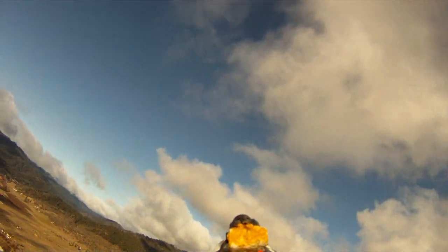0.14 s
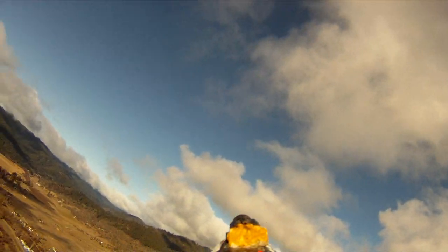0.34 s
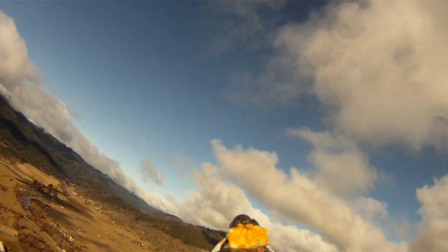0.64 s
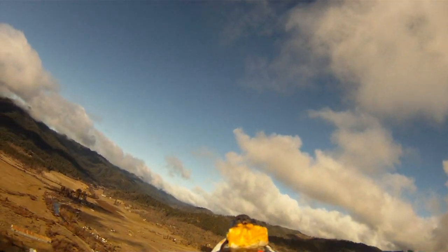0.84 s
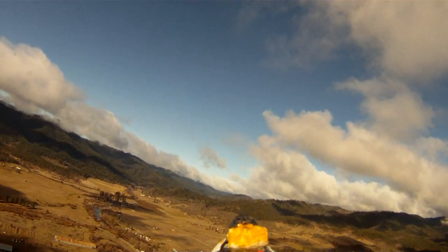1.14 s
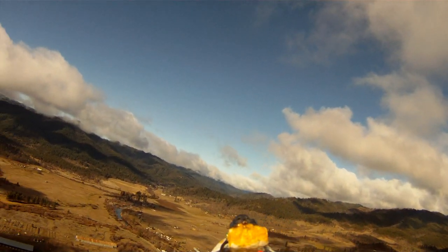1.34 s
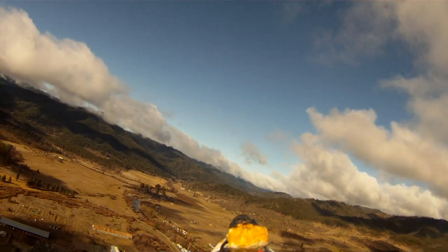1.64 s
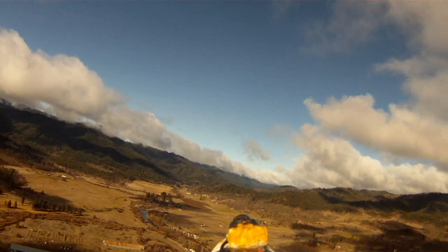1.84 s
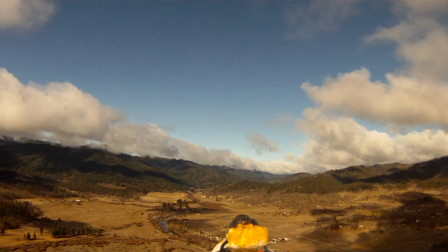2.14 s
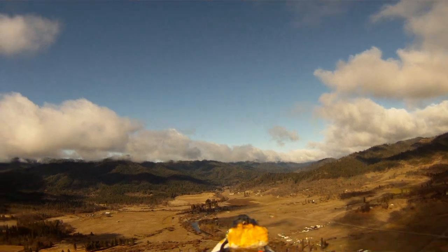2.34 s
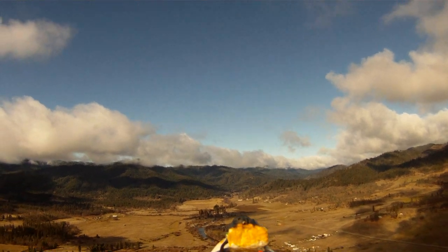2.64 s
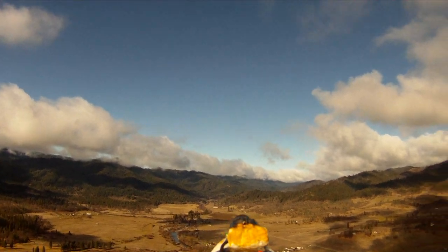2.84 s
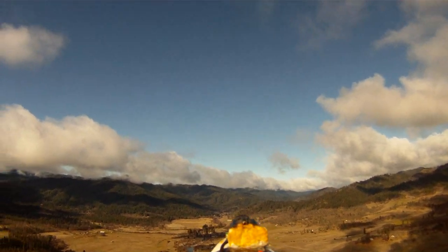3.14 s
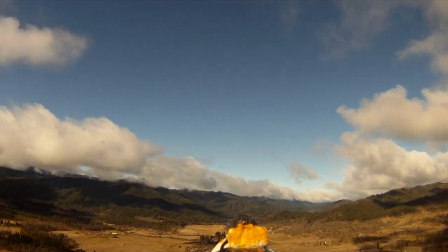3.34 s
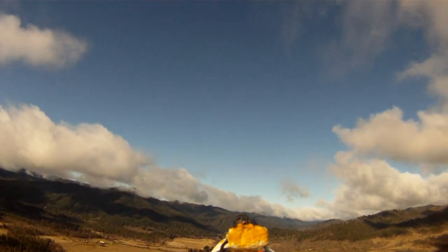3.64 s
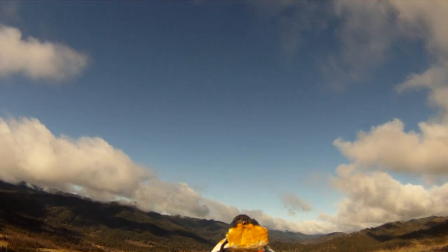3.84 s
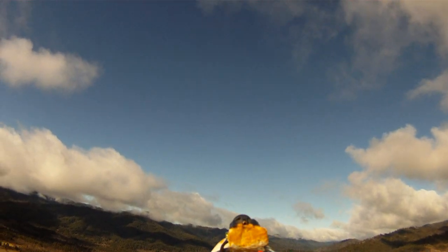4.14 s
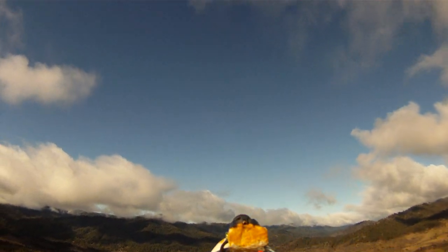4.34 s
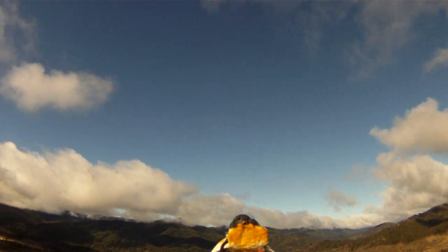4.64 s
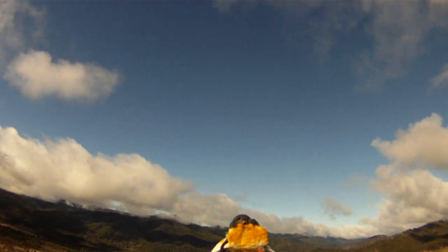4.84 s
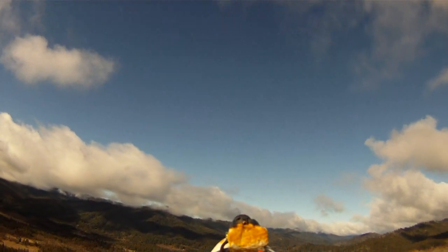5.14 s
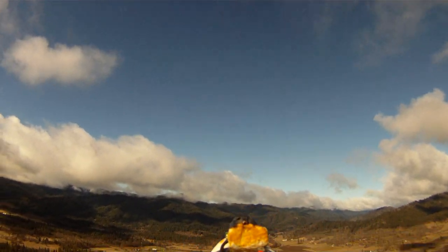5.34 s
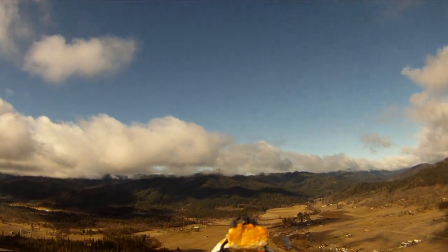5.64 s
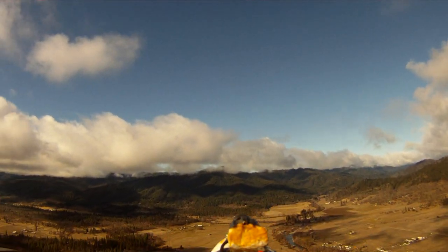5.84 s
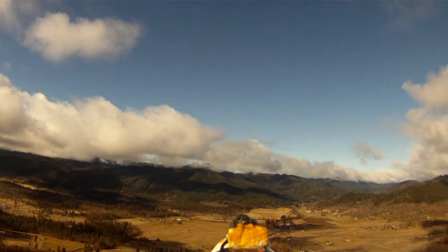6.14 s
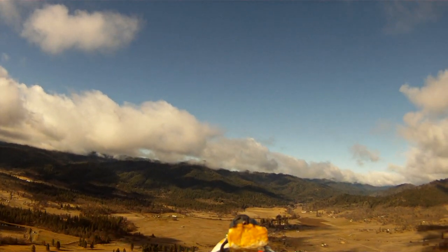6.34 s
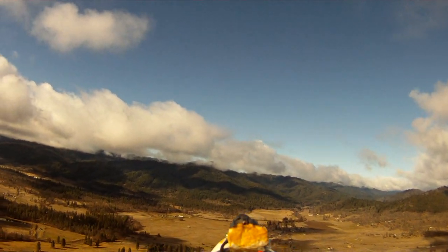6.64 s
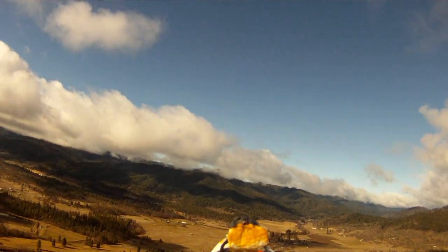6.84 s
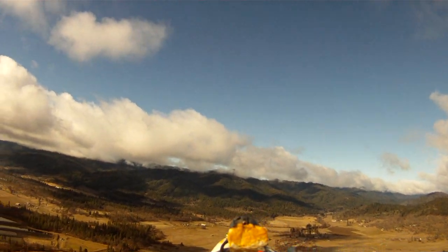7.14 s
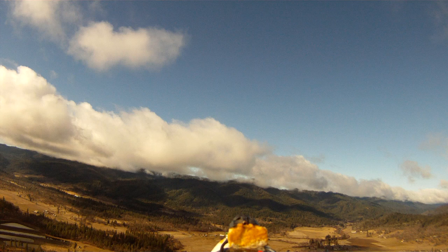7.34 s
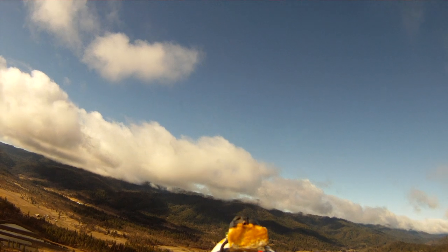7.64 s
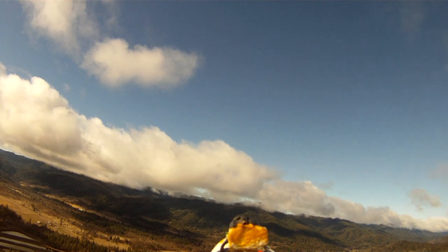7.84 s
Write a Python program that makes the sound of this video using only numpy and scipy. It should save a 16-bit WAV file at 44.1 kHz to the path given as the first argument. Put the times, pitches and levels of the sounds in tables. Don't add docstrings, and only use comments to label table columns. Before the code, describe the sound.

A continuous close propeller buzz vibrates through a light foam airframe high in open air. Slipstream hisses around the microphone and makes the body ring unevenly. Shortly after three seconds the throttle eases back and the pitch falls within about half a second, then stays at a slightly lower, rougher cruise. Later a thin edge whistle wavers in the wind. The sound is dry, low-fidelity and grainy, without any echo.

```python
import sys
import numpy as np
from scipy import signal
from scipy.fft import rfft, irfft, next_fast_len
from scipy.io import wavfile
from scipy.ndimage import uniform_filter1d

SR = 44100
rng = np.random.default_rng(int(sys.argv[2]) if len(sys.argv) > 2 else 0)


def bounce(signal):
    frames = np.transpose(np.atleast_2d(signal))
    limited = np.clip(frames, -1, 1)
    pcm = np.round(limited * 32767).astype(np.int16)
    wavfile.write(sys.argv[1], SR, pcm)


def rack_gain(trim_db):
    fader = np.asarray(trim_db, float)
    return 10 ** (fader / 20)


N = 351918

SETTING_HZ = (311, 301.5, 291.5, 283, 269)
# time_s, blade_rate_gained_hz
AIRSPEED = [(0, -.2), (.6, .3), (1.05, .3), (1.8, -.45), (2.4, .4), (2.8, -1.35), (3.18, .35), (3.36, -.4),
            (3.8, -.4), (3.93, .3), (4.5, -.3), (5.05, -.3), (5.65, .6), (5.9, -1.5), (6.3, -1.25),
            (6.85, .9), (7.3, 1), (7.98, .6)]


def curves(table):
    time_s, *columns = np.transpose(table)
    return [np.interp(np.arange(N) / SR, time_s, column) for column in columns]


def walk(rate_hz):
    hold = int(SR / rate_hz)
    held = np.repeat(rng.standard_normal(N // hold + 1), hold)
    return 1.33 * uniform_filter1d(uniform_filter1d(held, hold), hold)[:N]


def tint(power):
    size = next_fast_len(N)
    hz = np.maximum(np.arange(size // 2 + 1) * SR / size, 1)
    spectrum = rfft(rng.standard_normal(size)) * np.sqrt(power(hz) * SR / 2)
    return irfft(spectrum, size)[:N]


def blade_rate():
    # start_s, length_s, blade_rate_lost_hz
    stick = [
        (3.37, .066, 21.1),
        (3.543, .145, 23.9),
        (3.78, .07, -1.3),
    ]
    full_hz, lag_s = 311.9, 0.0295
    t = np.arange(N) / SR
    lost = sum(hz * np.clip((t - start) / length, 0, 1) for start, length, hz in stick)
    keep = np.exp(-1 / (lag_s * SR))
    lost = signal.lfilter([(1 - keep) ** 2], [1, -2 * keep, keep ** 2], lost)
    return full_hz - lost + curves(AIRSPEED)[0]


def propeller(hz, turn, high, inflow_db):
    stack = [(-13, -14.5, -16, -14.6, -14), (-24.5, -25.5, -24.5, -23.5, -21),
             (-22, -35, -28.5, -19, -25.5), (-24.8, -38, -22, -24.5, -27), (-31, -41, -37, -38, -48),
             (-22.5, -24, -25, -16.5, -24.5), (-42.5, -40, -44, -38, -45.5), (-31, -38, -39, -29, -28),
             (-44, -54, -44, -40, -62), (-32, -37, -33, -34, -44.5), (-31.5, -27.5, -27, -33, -36),
             (-34, -33, -38, -38, -44), (-44.5, -38, -48, -52, -55), (-50, -48, -49, -49, -43.5),
             (-46.5, -60, -55, -55, -57), (-51, -49, -55, -66, -58), (-57, -67, -59, -52, -58),
             (-58, -55, -55, -64, -51)]
    inflow_shares = (-.05, 0.12, 0.24, 1, -0.65, 0.2, 1.1, .2, 0.99, .1, 0.18, 0.56, 0.61, .9, 0.12, .4, .3,
                     .3)
    load_gains = (0, -0.8, -0.4, 0, 0, 0, 2, 0.6, 0, 0.6, 0.2, 3, -2, 1, 0, -1, -2, 1)
    drift = walk(2.6)
    turn = turn + 0.013 * walk(18)
    buffet_db = 0.11 * walk(30)
    lead = 1.6 - 3.2 * high
    load_hz = -curves(AIRSPEED)[0]
    spread = 0.351 * (0.086 + 0.909 * high)
    out = 0
    for k, (setting_db, share, db_per_hz) in enumerate(zip(stack, inflow_shares, load_gains), 1):
        db = np.interp(hz, SETTING_HZ[::-1], setting_db[::-1]) + 0.08 * k + 0.3 * drift
        db = db + share * inflow_db + db_per_hz * load_hz
        db = db + min(0.084 * k, 1.1) * walk(22) + buffet_db
        late = spread * np.clip(k - 4, 0, 8) ** 2
        out = out + np.sqrt(2) * rack_gain(db) * np.cos(k * turn + (k > 1) * lead - late)
    return out


def bearings(turn, high):
    # multiple_of_blade_rate, high_throttle_db, cruise_db
    ball_lines = [(1.21, -47.5, -63), (2.21, -49.5, -52), (3.142, -43, -43), (3.21, -59, -63),
                  (3.42, -37.5, -51), (3.727, -47.5, -46), (3.878, -43.5, -35.5), (4.163, -43, -37),
                  (4.42, -47.5, -33), (5.164, -34, -44), (5.266, -30.5, -49), (5.42, -45.5, -60)]
    out = 0
    for k, top_db, low_db in ball_lines:
        db = low_db + high * (top_db - low_db) + 2.3 * walk(9)
        slip = 0.79 * walk(11) + 0.1 * k * walk(45)
        out = out + np.sqrt(2) * rack_gain(db) * np.cos(k * turn + slip)
    return out


def whistle():
    # time_s, pitch_hz, level_db
    edge_tone = [(5.2, 805, -55), (5.45, 776, -38), (5.78, 832, -46), (5.88, 862, -35), (6.2, 860, -36),
                 (6.37, 840, -30), (6.5, 825, -45), (7.1, 748, -42), (7.45, 775, -43)]
    hz, db = curves(edge_tone)
    cycle = 2 * np.pi * np.cumsum(hz) / SR + 0.44 * walk(14)
    octave_db = 7.0 - 5.4 * np.clip((862 - hz) / 40, 0, 1)
    started = np.arange(N) > edge_tone[0][0] * SR
    level = np.sqrt(2) * rack_gain(db + 1.3 * walk(8.1))
    return started * level * (np.cos(cycle) + rack_gain(octave_db) * np.cos(2 * cycle))


def slipstream(column, rings, turn, chop_db):
    # frequency_hz, high_throttle_db_per_hz, cruise_db_per_hz
    hiss_colour = [(20, -87, -85), (44.7, -69, -57.5), (135, -66, -65), (590, -64.5, -63.5),
                   (945, -61, -58.5), (1190, -55, -55), (1433, -66, -62.5), (1600, -57, -55),
                   (2230, -60.5, -60), (2900, -66, -64.5), (3280, -70, -64.5), (4170, -70, -74),
                   (5580, -71.5, -69), (6130, -83, -83)]
    columns = np.transpose(hiss_colour)
    log_hz, hiss_db = np.log(columns[0]), columns[column]

    def broad(hz):
        return rack_gain(2 * np.interp(np.log(hz), log_hz, hiss_db))

    def upper(hz):
        return 1 / (1 + (2300 / hz) ** 6)

    def modes(hz):
        return sum(rack_gain(2 * peak_db) / (1 + (2 * (hz - f) / width) ** 2) ** 2 for f, width, peak_db in rings)

    chop = rack_gain(chop_db * (0.5 * np.sin(turn) - np.cos(2 * turn)))
    low_hiss = tint(lambda hz: broad(hz) * (1 - upper(hz))) * rack_gain(0.35 * np.cos(turn))
    high_hiss = tint(lambda hz: broad(hz) * upper(hz)) * chop
    ring = tint(modes) * rack_gain(0.78 * walk(4.6))
    swell_db = 0.25 * walk(3) + 0.43 * walk(40)
    return (low_hiss + high_hiss + ring) * rack_gain(swell_db)


def scene():
    # time_s, level_db
    inflow = [(0, -3), (1.3, -1), (1.6, 0.5), (2.44, 3.5), (2.8, -4.5), (3.0, 2.5), (3.2, 4.5), (3.4, 1.5),
              (4.1, 1), (5.3, -1), (5.55, 1.5), (5.8, -3), (6.05, 0), (6.25, -1), (6.5, 1), (7.45, -1),
              (7.98, 0)]
    # frequency_hz, width_hz, peak_db_per_hz
    rings_high = [(70.6, 34, -55), (375, 32, -59), (490, 38, -63.5), (790, 64, -56), (1016, 50, -54.5),
                  (1630, 150, -52), (1957, 87, -54.5), (2310, 40, -68), (3130, 230, -63.5),
                  (3660, 420, -63), (5330, 32, -63)]
    # frequency_hz, width_hz, peak_db_per_hz
    rings_cruise = [(79.5, 35, -52), (236, 58, -55.5), (344, 9.1, -54), (372, 14, -74), (455.5, 30, -52.5),
                    (630, 65, -58), (1030, 70, -51.5), (1547, 68, -52), (1685, 107, -50),
                    (2103, 300, -55.5), (2376, 47, -57.5), (2640, 40, -58), (3150, 170, -66),
                    (3730, 560, -63), (4840, 130, -64.5), (5360, 210, -67.5), (5870, 25, -72)]
    hz = blade_rate()
    inflow_db = curves(inflow)[0]
    turn = 2 * np.pi * np.cumsum(hz) / SR
    high = np.clip((hz - SETTING_HZ[-1]) / (SETTING_HZ[0] - SETTING_HZ[-1]), 0, 1)
    tones = propeller(hz, turn, high, inflow_db)
    air = np.sqrt(high) * slipstream(1, rings_high, turn, chop_db=1.5)
    air = air + np.sqrt(1 - high) * slipstream(2, rings_cruise, turn, chop_db=1.0)
    air = air * rack_gain(0.14 * inflow_db - 0.49 * curves(AIRSPEED)[0])
    sag_db_per_hz_s = 0.014
    sag = rack_gain(sag_db_per_hz_s * high * np.minimum(np.gradient(hz) * SR, 0))
    return (tones + sag * (air + bearings(turn, high)) + whistle())[None]


def band_limit(x):
    return signal.sosfilt(signal.butter(12, 16090, fs=SR, output="sos"), x)


def record(dry):
    capsule = np.tanh(0.75 * dry) / 0.75
    guard = signal.butter(6, 5800, fs=SR, output="sos")
    capsule = signal.sosfilt(guard, capsule)
    slow = signal.resample_poly(capsule, 40, 147, axis=1, window=("kaiser", 3))
    held = np.repeat(slow, 4, axis=1)
    held = signal.resample_poly(held, 147, 160, axis=1)[:, :N]
    top_cut = signal.ellip(14, 0.3, 80, 15265, fs=SR, output="sos")
    held = signal.sosfilt(top_cut, held)
    return band_limit(held)


dry = scene()
out = record(dry)
bounce(out)
```